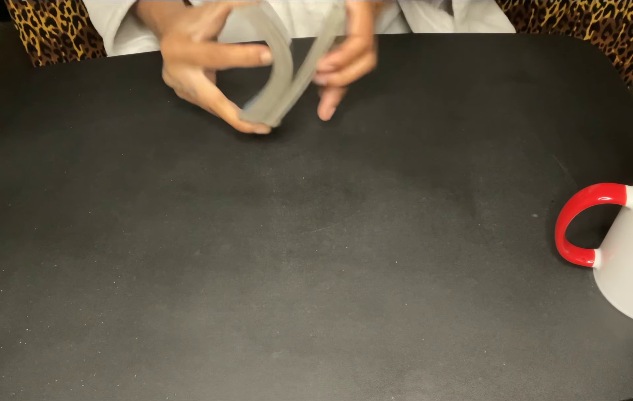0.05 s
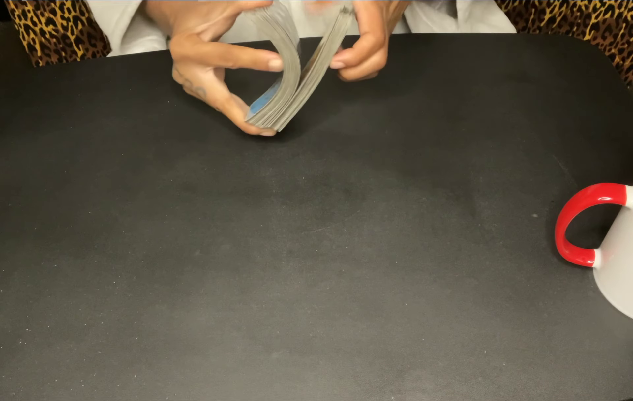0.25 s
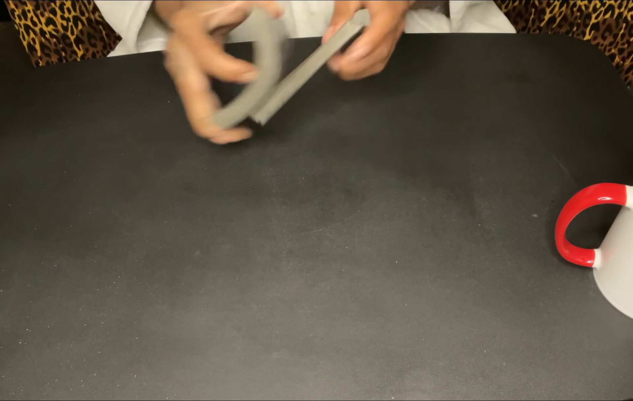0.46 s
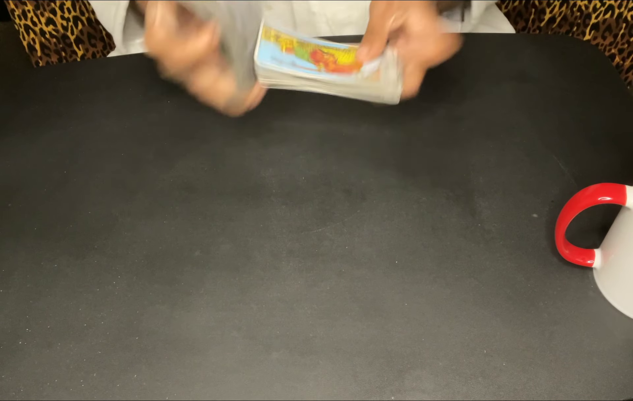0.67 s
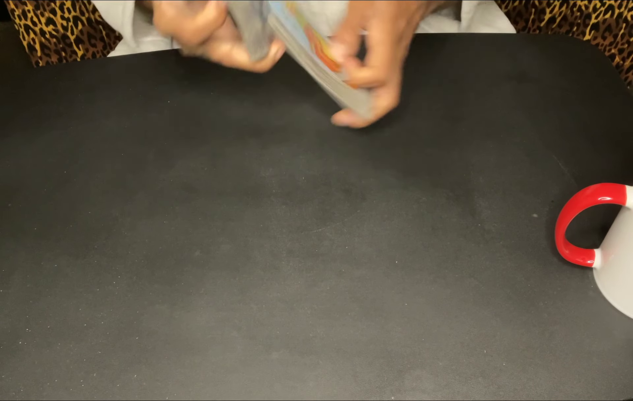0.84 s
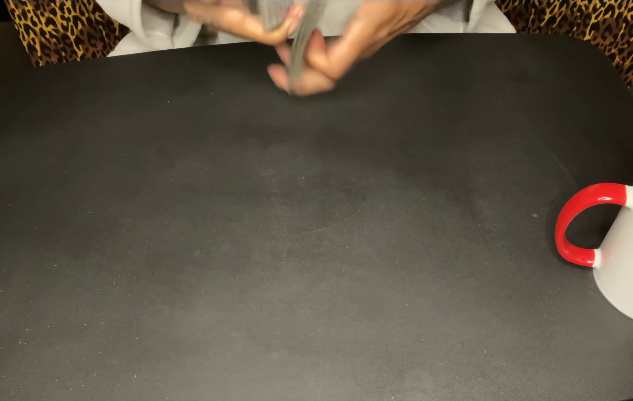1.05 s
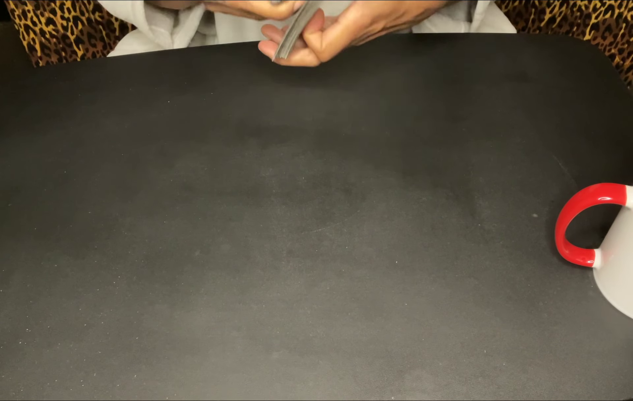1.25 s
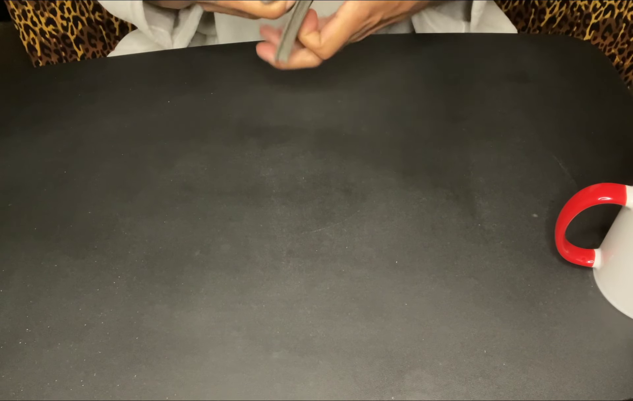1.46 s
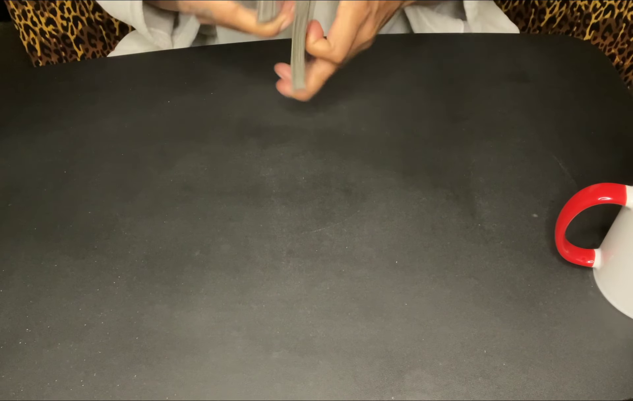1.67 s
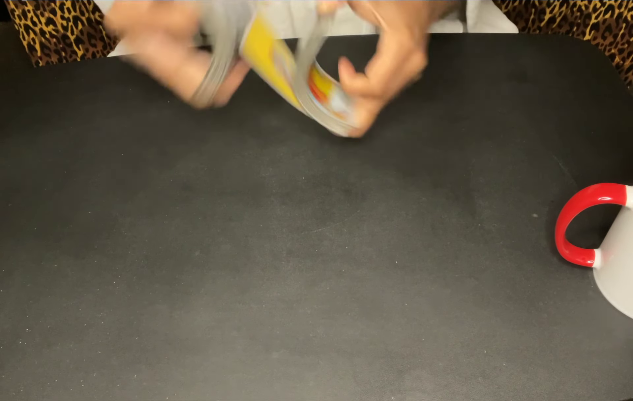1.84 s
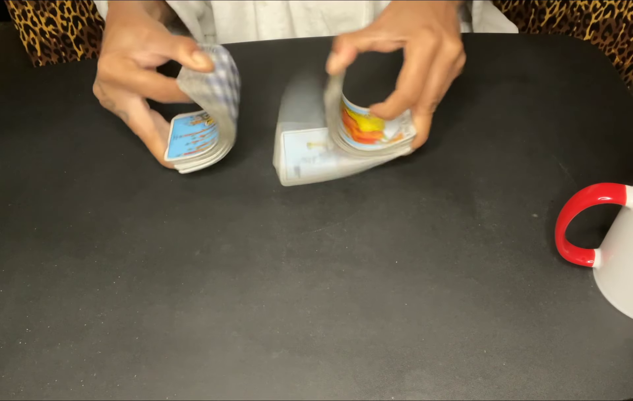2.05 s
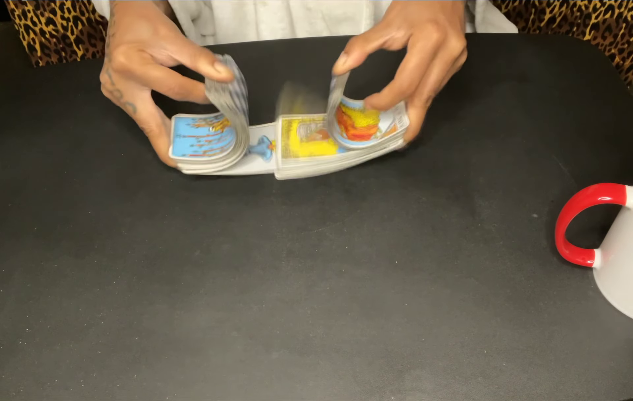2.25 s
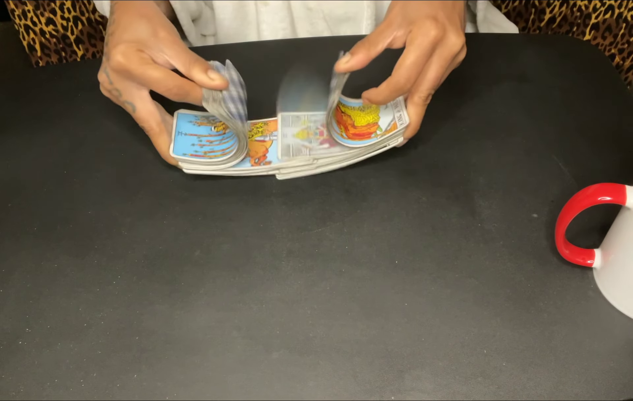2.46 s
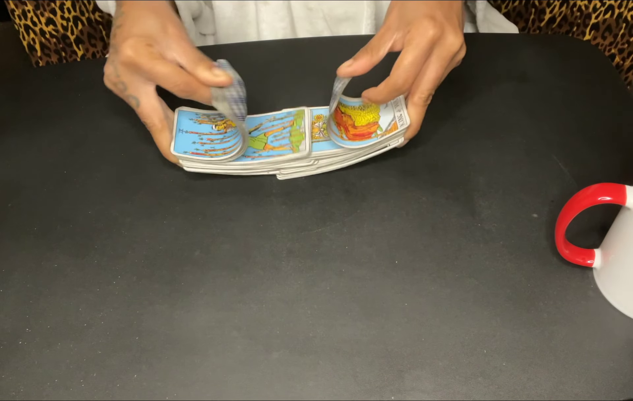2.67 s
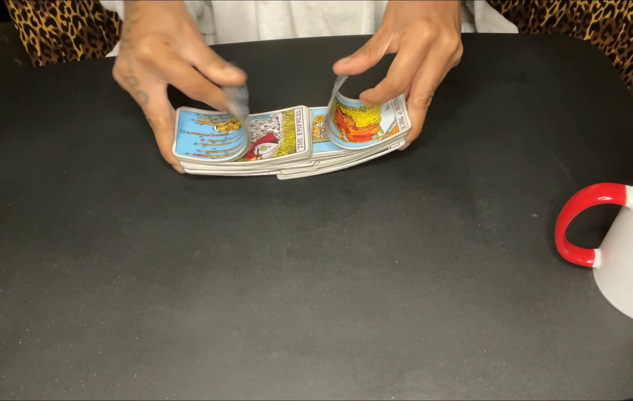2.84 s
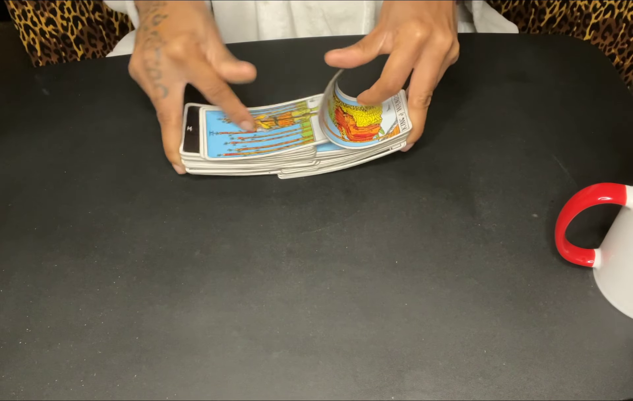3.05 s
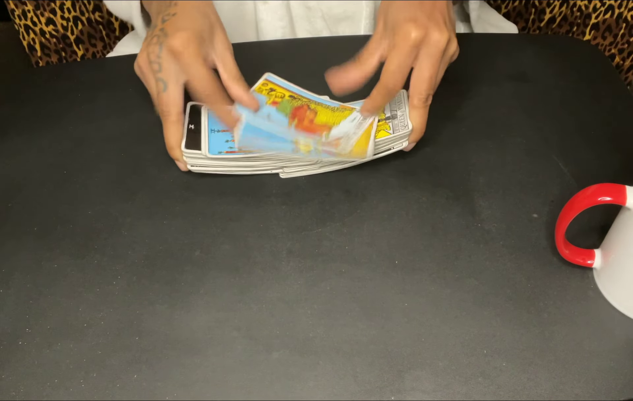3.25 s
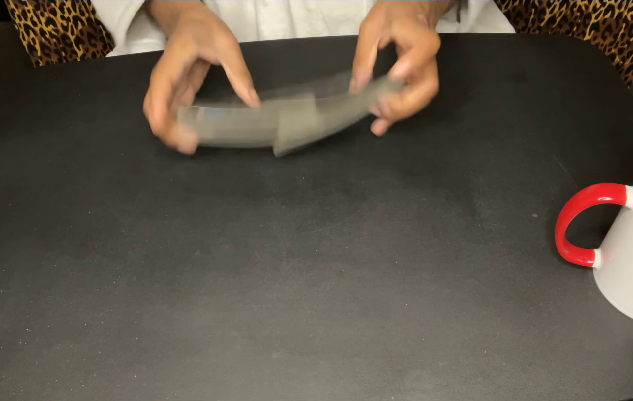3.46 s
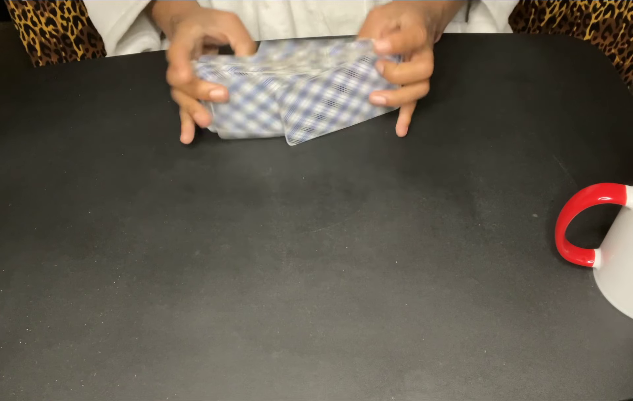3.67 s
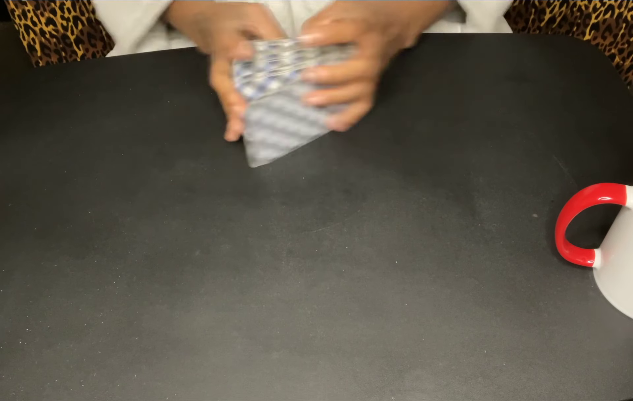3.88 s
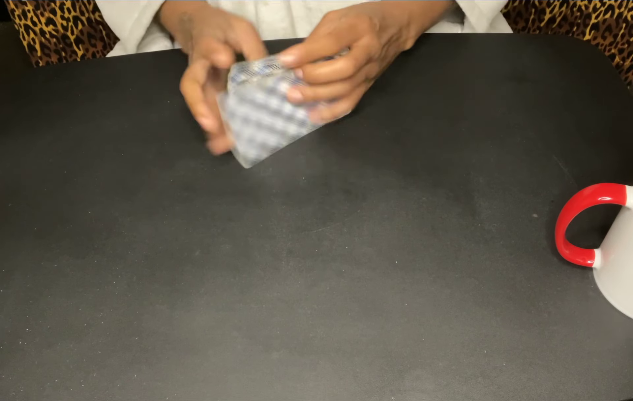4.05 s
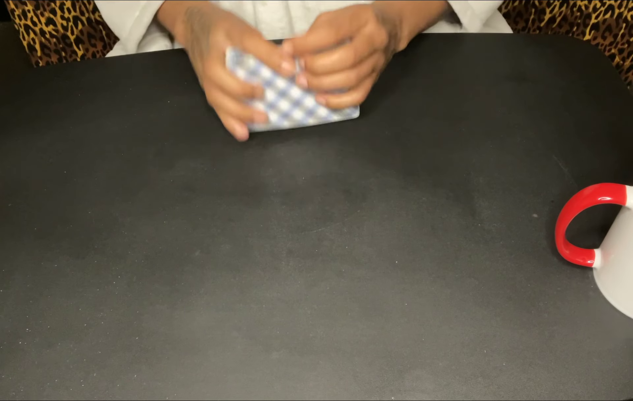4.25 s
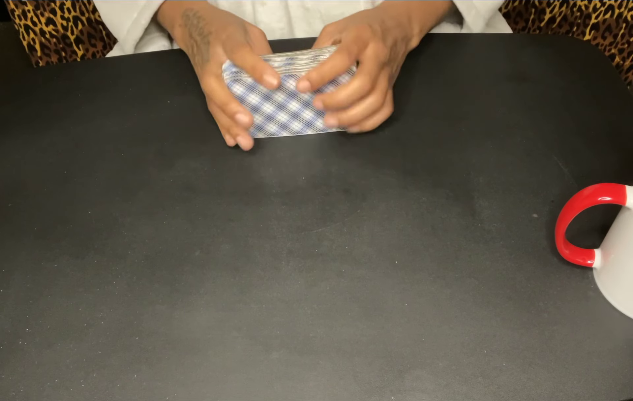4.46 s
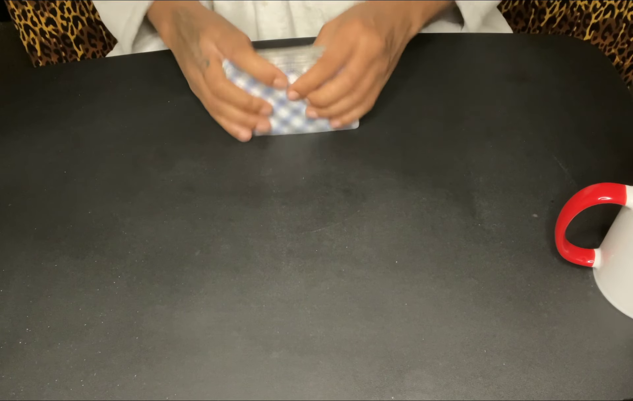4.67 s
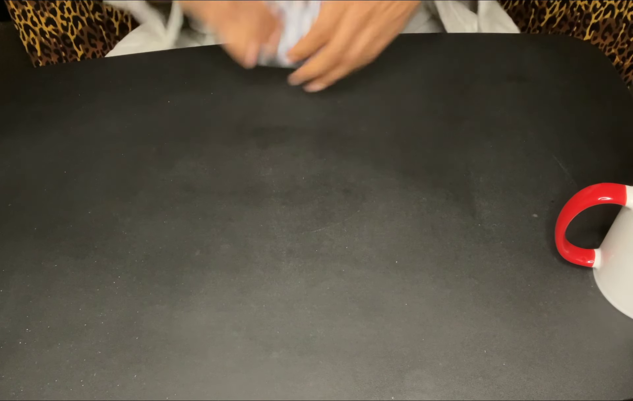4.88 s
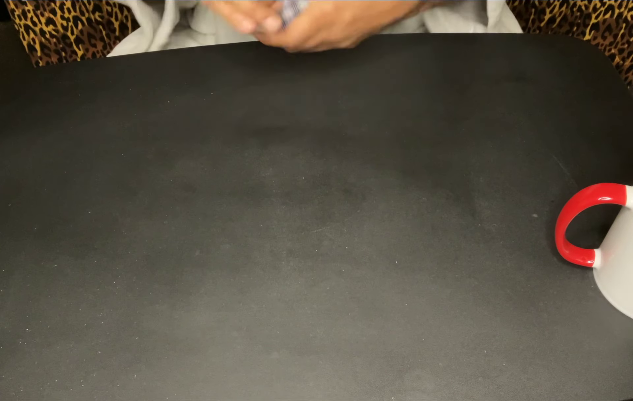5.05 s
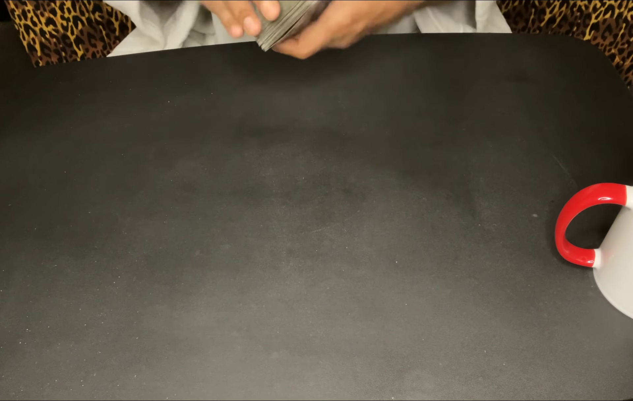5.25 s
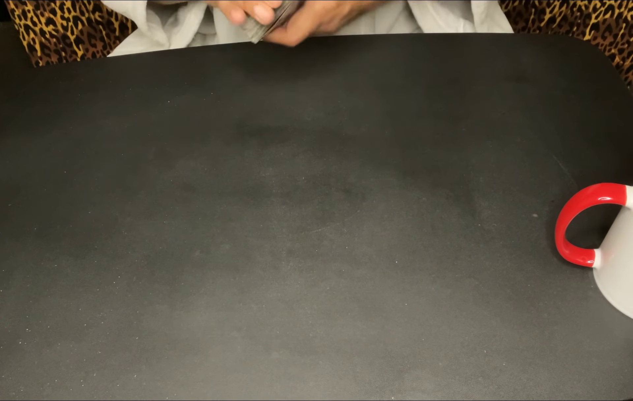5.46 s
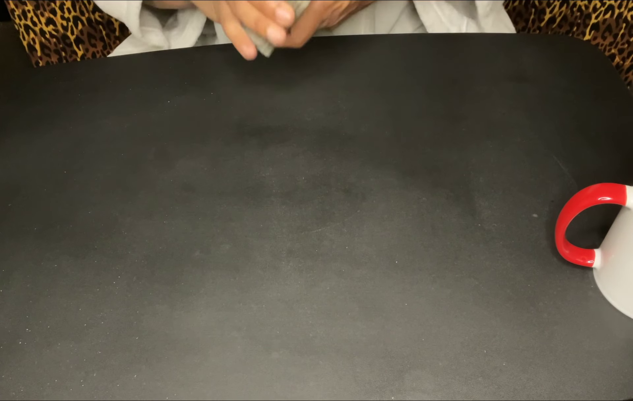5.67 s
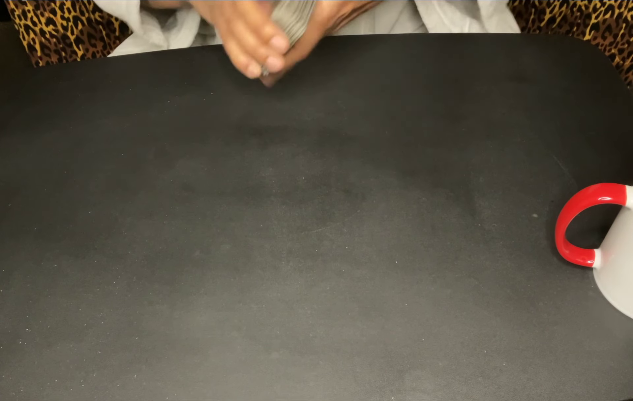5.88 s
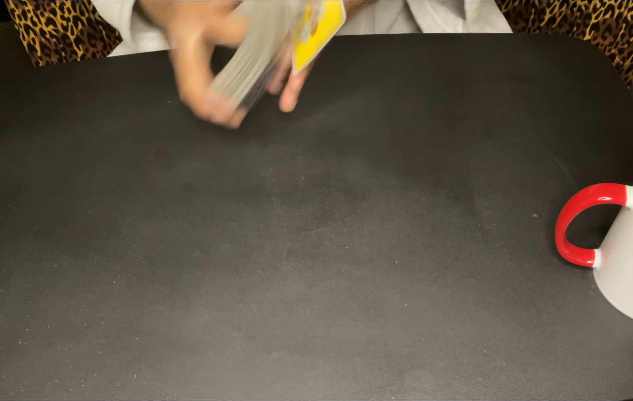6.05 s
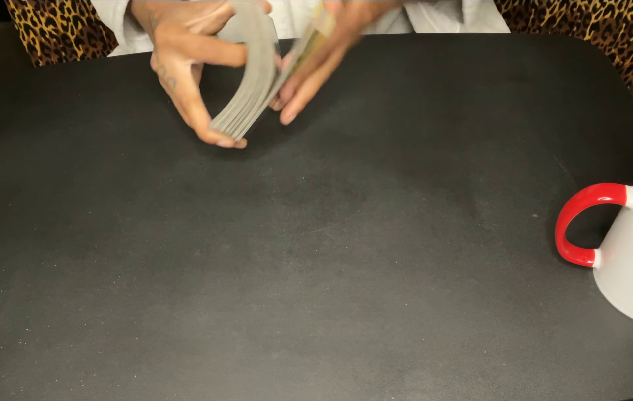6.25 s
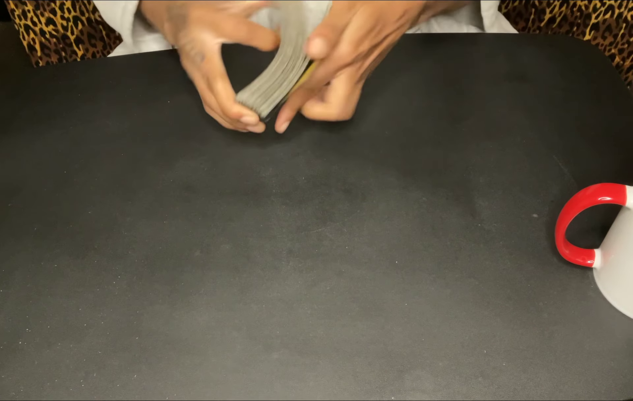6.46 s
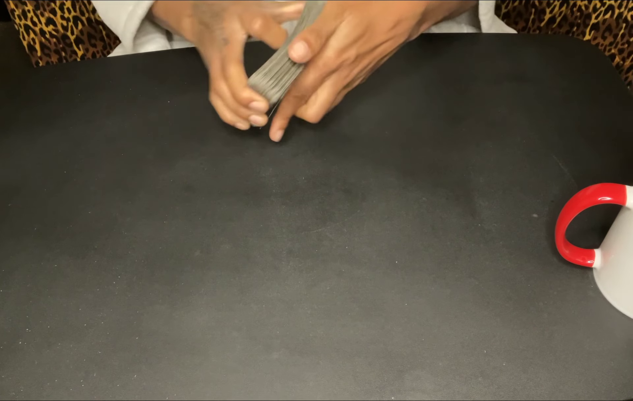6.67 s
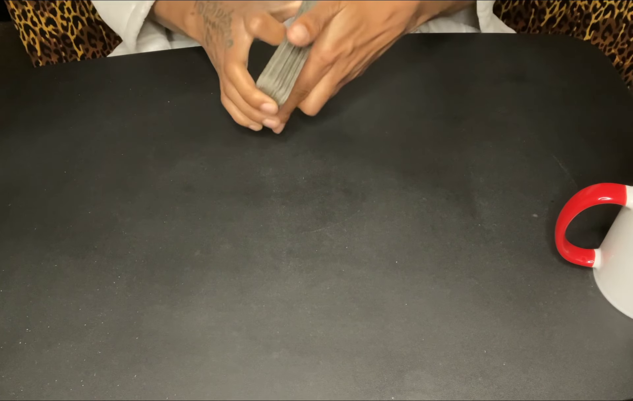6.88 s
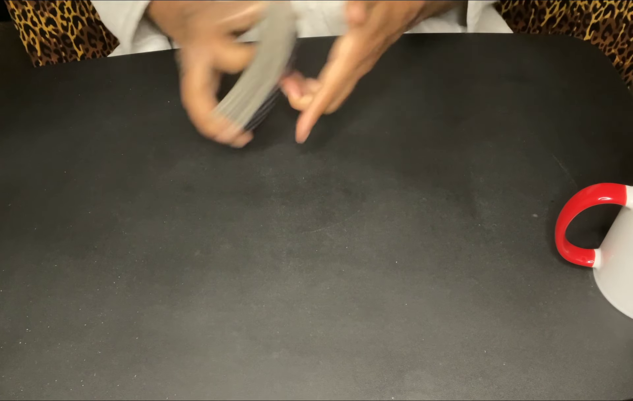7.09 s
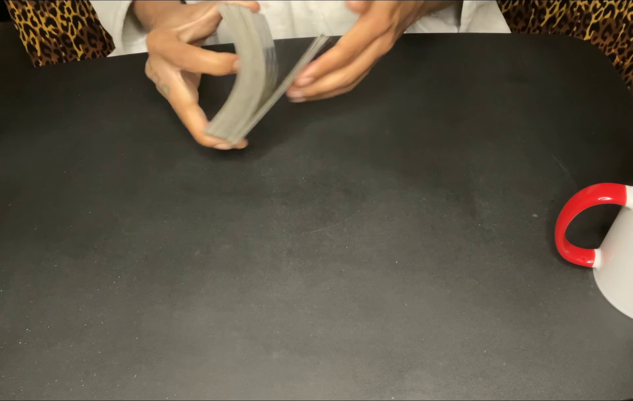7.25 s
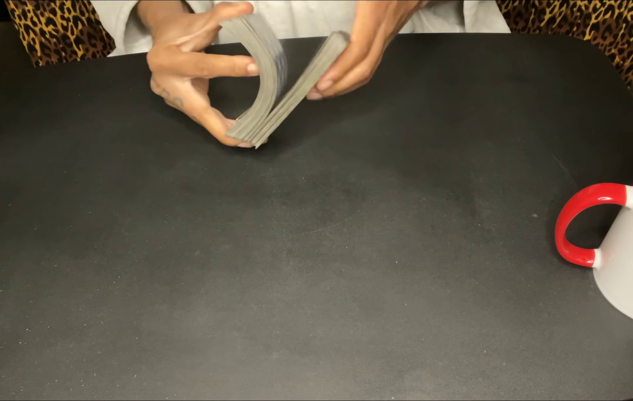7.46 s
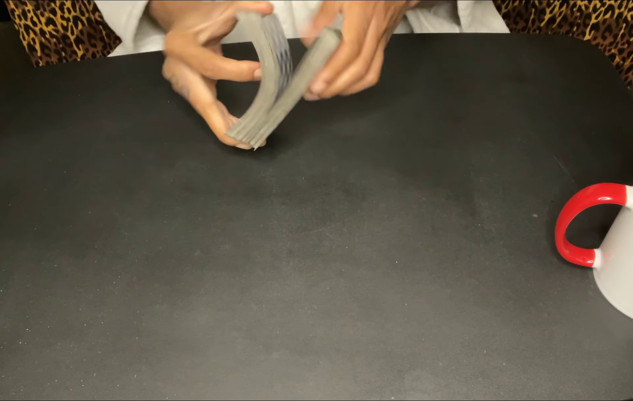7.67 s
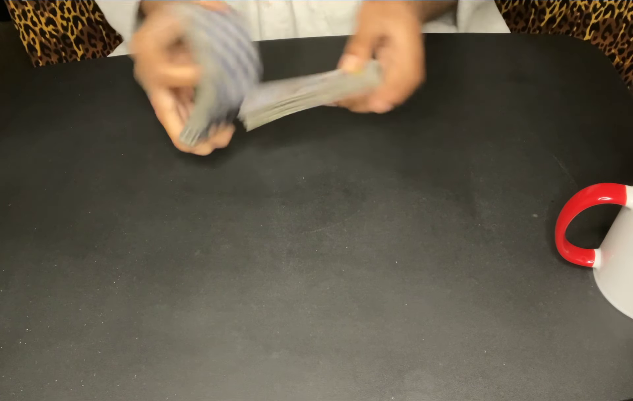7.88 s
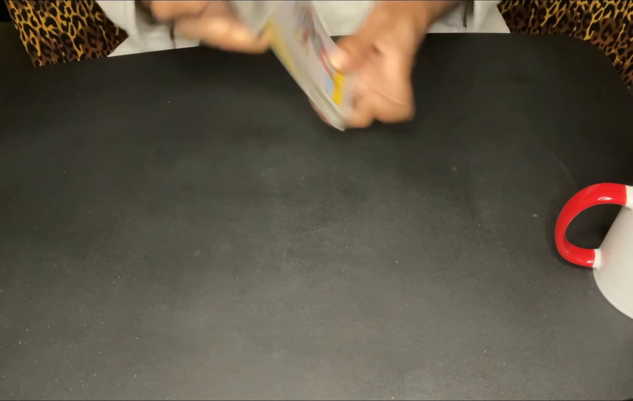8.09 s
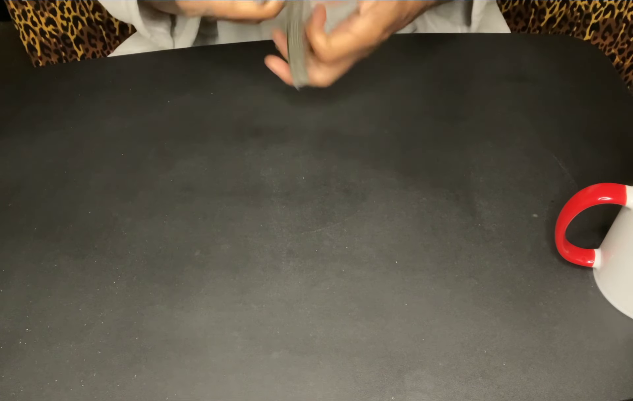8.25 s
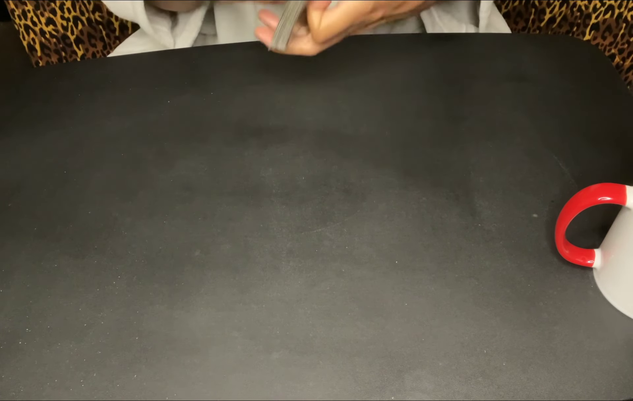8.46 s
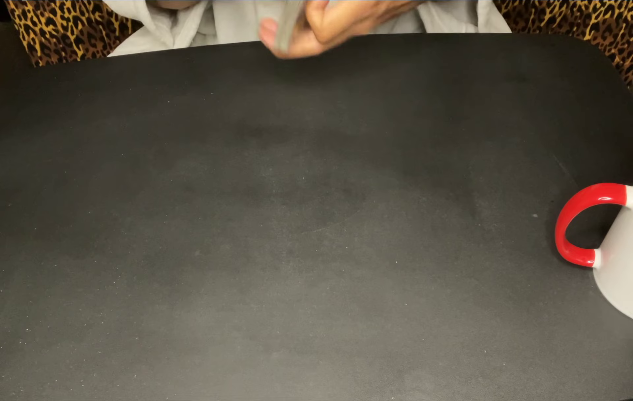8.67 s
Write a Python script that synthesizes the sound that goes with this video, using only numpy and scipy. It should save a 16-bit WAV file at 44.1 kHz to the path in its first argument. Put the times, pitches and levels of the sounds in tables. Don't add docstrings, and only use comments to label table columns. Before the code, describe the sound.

Close to a padded tabletop in a small quiet room, a few cards snap off a thumb, fingers rustle softly, then a rapid riffle slaps loudly onto the table and thins out. The arched deck cascades down with duller knocks, is pushed together with soft slides and squared with a tap. After quiet handling, lighter flicks come in quick runs and fade into faint hiss.

```python
import sys
import numpy as np
from scipy import signal
from scipy.fft import rfft, irfft, next_fast_len
from scipy.io import wavfile
from scipy.ndimage import uniform_filter1d

SR = 44100
rng = np.random.default_rng(int(sys.argv[2]) if len(sys.argv) > 2 else 0)


def ratio_of_db(decibels):
    return 10 ** (np.asarray(decibels, float) / 20)


def pcm_store(signal):
    levels = np.round(np.clip(np.atleast_2d(signal), -1, 1) * 32767)
    wavfile.write(sys.argv[1], SR, levels.astype(np.int16).T)


N = 384552

# t/s, peak level/dB, thump level/dB, ring f/Hz
FIRST_FLICKS = [
    (0.0044, -20, -12, 1855),
    (0.0292, -8.5, -17, 1720),
    (0.0424, -22, -1, 2193),
    (0.0604, -27, -10.5, 2092),
    (0.0721, -2, -9.5, 2410),
    (0.1364, -26, -8.5, 2555),
    (0.1529, 1, -11.5, 2540),
]
# t/s, peak level/dB, thump level/dB, ring f/Hz
LATER_FLICKS = [(6.0835, -26.5, -8.5, 2470), (6.1483, -36.5, -11.5, 2200), (6.1628, -16, -6, 6560),
                (6.1703, -8.5, -13, 2000), (6.2217, -24, -10.5, 3450), (7.2009, -34, -17, 2025),
                (7.2144, -35, -19.5, 3060), (7.224, -28.5, -3, 2760), (7.2349, -16.5, -7, 2446),
                (7.2897, -41, -27, 1730), (7.3112, -18, -6, 3105), (7.3386, -12, -10.5, 2379),
                (7.3601, -20, -2, 2021), (7.371, -17, -3.5, 2140), (7.3764, -16, -5, 2545),
                (7.3915, -11.5, -6.5, 2448), (7.438, -39.5, -2, 2040), (7.4568, -4, -10.5, 2455),
                (7.4715, -18.5, -13.5, 2503), (7.5034, -21.5, -6, 2590), (7.5222, -15.5, -1.5, 2310),
                (7.5334, -28, -13, 2270)]
# t/s, peak level/dB, thump level/dB, ring f/Hz
HANDLING_TICKS = [(0.6624, -46, -10.5, 2100), (0.7017, -31.5, -11, 2380), (0.7835, -53.5, -13.5, 3340),
                  (0.8209, -35, -20, 2791), (1.7847, -37, 1, 1210), (1.7902, -29.5, -10.5, 2650),
                  (4.6313, -41.5, -14.5, 5130), (4.9635, -45.5, -22, 1950), (5.6909, -38, -23.5, 2600),
                  (6.1099, -38.5, -23, 2470), (6.2365, -34, -12, 3590), (6.5285, -28, -15.5, 2240),
                  (7.664, -50.5, -20, 5960), (8.0101, -29.5, -7.5, 1695), (8.104, -48, -20.5, 6500),
                  (8.167, -49, -21.5, 4010), (8.405, -41.5, -25, 9030), (8.446, -49, -20, 3000)]
# f/Hz, level/dB, t60/s
CUPPED_DECK = [(480, -1.5, 0.0047), (783, 2, 0.0094), (975, 0.5, 0.0096), (1350, -1, 0.00705),
               (1720, -4, 0.0053)]
# f/Hz, level/dB, t60/s
BENT_HALF_DECK = [(512, -4.5, 0.0053), (873.4, 0, 0.0087), (1106, 1, .008), (1500, 0.5, .008),
                  (2000, -1, .007)]


def flicks():
    rows = voiced(LATER_FLICKS, (-19.5, -0.47, 0, 0.5)) + voiced(HANDLING_TICKS, (-44, -0.72, -10.5, 4.63))
    out = contacts(rows, CUPPED_DECK, thump_db=-0.5, ring_db=-2.5, ring_t60=0.0073,
                   chatter_db=-9.5, chatter_t60=0.008, wet_db=-5.5, low_wet_db=-4, echo_db=-3,
                   blur=0.084, wide=2.634)
    out += contacts(voiced(FIRST_FLICKS, (-19.5, 0.32, -1, 1.63)), BENT_HALF_DECK, thump_db=0.5,
                    ring_db=-7.5, ring_t60=0.00358, chatter_db=-8.5, chatter_t60=0.01,
                    wet_db=-6.5, low_wet_db=1.0, echo_db=-7, blur=0.12, wide=3.3, top=1.334)
    return signal.sosfilt(signal.butter(2, 300, "high", fs=SR, output="sos"), out)


# t/s, peak level/dB, thump level/dB, ring f/Hz
SLAPS = [(1.9896, -21, -16.5, 1350), (2.0142, -11.5, -14.5, 2132), (2.0555, -31, -12, 1408),
         (2.0674, -13.5, -11.5, 2144), (2.0722, -6.5, -11, 2608), (2.115, -34, -20, 5992),
         (2.1338, -20, -4, 1397), (2.151, 5, -14, 2000), (2.1769, -6, -9, 2109), (2.2727, 1.5, -10.5, 3980),
         (2.3466, -26, 2, 4173), (2.364, 5.5, -15.5, 1963), (2.4374, 8.5, -21.5, 2214),
         (2.4492, 4.5, -12.5, 1803), (2.4757, 3, -25, 2603), (2.5122, 1.5, -26.5, 2206),
         (2.569, 9, -23.5, 1861), (2.6148, 6, -30, 2200), (2.627, -1, -17, 2198), (2.666, 6.5, -16.5, 2191)]
# t/s, peak level/dB, thump level/dB, ring f/Hz
LAST_SLAPS = [(2.7763, 4.5, -20.5, 1923), (2.785, 4, -27, 1750), (2.9045, -4, -18, 2000),
              (2.9236, -15.5, -25.5, 1620), (2.9286, -3.5, -26, 1825), (2.9725, -17, -17, 2960),
              (2.9853, -9.5, -15.5, 2910), (3.0015, -10.5, -26, 2184), (3.007, -23, -22.5, 4476),
              (3.0204, -14.5, -18, 3780), (3.0262, -15.5, -32, 2298), (3.1137, -3, -23, 3910),
              (3.1245, -24, -26.5, 4501), (3.1362, -11.5, -27, 3038), (3.1768, -26.5, -24.5, 2673),
              (3.196, -19.5, -26, 2670), (3.206, -21, -23, 4647)]
# t/s, peak level/dB, thump level/dB, ring f/Hz
BENT_CARDS = [
    (2.201, 3, -12.5, 2556),
    (2.266, -3.5, -5, 2508),
    (2.2834, -9, -7, 2520),
    (2.2735, -6.5, -30, 4690),
    (2.4765, -3, -30, 4655),
    (2.513, -7.5, -30, 4545),
]
# f/Hz, level/dB, t60/s
TABLE = [(80.8, -10, 0.079), (105, -20, 0.042), (141, -4, 0.1), (186, -3, 0.056), (254.8, -2.5, 0.055),
         (317.5, -1.5, 0.055), (404.8, 5.5, 0.035), (480, -3.5, 0.07), (610.7, 4, 0.046), (723, -5, 0.043),
         (966, -6, 0.024)]


def slaps():
    out = contacts(voiced(SLAPS, (-13.5, 0.5651, -10, -0.14)), TABLE, thump_db=-6.0,
                   ring_db=-8, ring_t60=0.0072, chatter_db=-7, chatter_t60=0.012,
                   wet_db=-2.0, low_wet_db=-3.0, echo_db=-0.54, wide=2.3)
    out += contacts(voiced(LAST_SLAPS, (-16, 0.03, -12, -0.01)), TABLE, thump_db=-5.5,
                    ring_db=-8, ring_t60=0.0062, chatter_db=-5.5, chatter_t60=0.013,
                    wet_db=-1.0, low_wet_db=-2.0, echo_db=-2, wide=2.394)
    out += contacts(voiced(BENT_CARDS, (-14, 0.38, -4, 0.31)), TABLE, thump_db=-3.5,
                    ring_db=-1.0, ring_t60=0.021, chatter_db=-8.0, chatter_t60=0.014,
                    wet_db=-2.5, low_wet_db=-3.0, echo_db=-0.18, blur=0.19)
    return signal.sosfilt(signal.butter(4, 92, "high", fs=SR, output="sos"), out)


# t/s, peak level/dB, hiss centre f/Hz
EDGE_SNAPS = [(0.0049, -24.5, 5000), (0.03, -19.5, 5500), (0.1532, -8, 4500), (2.1768, -4.5, 5500),
              (2.267, -5, 5000), (2.4487, 2, 5500), (2.4762, 4, 5600), (2.5126, -3, 4600),
              (2.5673, 0, 5000), (2.6263, -9, 5000), (2.666, -2, 5000), (2.7865, -4, 5000),
              (2.9247, -11.5, 5500), (3.018, -13, 5500), (3.1137, -6, 5500), (3.1769, -22.5, 5000),
              (3.2067, -21.5, 5000), (3.6404, -30, 4000), (3.6553, -26.5, 4000), (3.677, -24.5, 4500),
              (3.6845, -24.5, 4500), (3.7219, -23.5, 5000), (3.7324, -30.5, 4500), (4.3919, -23.5, 3600),
              (4.4137, -26, 3600)]
# t/s, peak level/dB, hiss centre f/Hz
GRAZES = [
    (0.066, -39.5, 6000),
    (0.135, -36, 4997),
    (2.345, -24, 4206),
    (4.392, -25.5, 3400),
    (2.7695, -24, 3500),
    (2.887, -34, 3500),
    (2.9705, -20, 4030),
    (3.105, -20, 4000),
    (3.136, -22, 4500),
]


def card_edges():
    def thin(rows):
        return [(s, db, -60, hz, -17, -14) for s, db, hz in rows]

    out = contacts(thin(EDGE_SNAPS), TABLE, thump_db=0, ring_db=-8, ring_t60=0.008,
                   chatter_db=-16, chatter_t60=0.0079, wet_db=-7, echo_db=0.5, wide=1.7, blow_db=-9)
    out += contacts(thin(GRAZES), TABLE, thump_db=0, ring_db=-30, ring_t60=0.008,
                    chatter_db=-8, chatter_t60=0.035, wet_db=-5, wide=2.5, blow_db=-25)
    return out


# t/s, peak level/dB, thump level/dB, ring f/Hz
KNOCKS = [
    (3.5764, -32.5, 13, 1200),
    (3.5861, -21.5, 7, 1316),
    (3.6017, -25, 3, 1217),
    (3.6123, -40, 8.5, 1330),
    (3.6216, -14.5, 7, 1229),
    (3.6306, -32, 1, 1280),
]
# t/s, peak level/dB, thump level/dB, ring f/Hz
CASCADE = [(3.639, -13, 1, 1350), (3.6469, -14, 2, 1337), (3.654, -8.5, -23.5, 1350),
           (3.6584, -14.5, -0.5, 1486), (3.6765, -6.5, -5.5, 1879), (3.6824, -5.5, -4.5, 1499),
           (3.6864, -7, -7, 1201), (3.6973, -12, -8, 2000), (3.7209, -6.5, -28, 1228),
           (3.7313, -7, -32, 1375), (3.7454, -28.5, -18.5, 1365), (3.768, -23, -2, 1290)]
# t/s, peak level/dB, thump level/dB, ring f/Hz
CATCHES = [
    (3.5875, -32.5, -19.5, 3510),
    (3.6775, -17, -23, 3528),
    (3.705, -20, -1, 3556),
    (3.7325, -19, -15.5, 3680),
    (3.778, -21, -20.5, 1500),
    (3.9734, -30.5, 2, 3474),
    (3.9827, -22, -12, 1634),
    (4.06, -26.5, -3.5, 1543),
    (4.087, -22, -17, 3625),
    (4.2455, -32.5, -14, 3540),
]
# t/s, peak level/dB, thump level/dB, ring f/Hz
SQUARING = [
    (4.1964, -31, 3.5, 1378),
    (4.2074, -48, 13.5, 1490),
    (4.2133, -44.5, 10.5, 1300),
    (4.3889, -9, 3.5, 1894),
    (4.3958, -13, -2, 1435),
    (4.403, -11.5, -3.5, 1321),
    (4.4144, -11.5, -12.5, 1420),
]
# f/Hz, level/dB, t60/s
ARCHED_PILE = [(135.6, -26.5, 0.19), (244.6, -30.5, 0.053), (343, -7, 0.065), (417.8, 2.5, 0.068),
               (581, 3, 0.0182), (853, 2.5, 0.0178), (1090, -10, 0.0146)]
# f/Hz, level/dB, t60/s
FALLING_ARCH = [(249, -19.5, 0.037), (397.6, -4.5, 0.0385), (577.5, 1, 0.029), (708.6, 2.5, .02),
                (854, 1.5, 0.018), (972, -3.5, 0.014), (1350, -1.5, 0.0158)]
# f/Hz, level/dB, t60/s
SQUARED_PILE = [(137.3, -18.5, 0.222), (172.6, -20.5, 0.0435), (234.6, -6.5, 0.0444), (350.3, -2, 0.0423),
                (423, 4, 0.048), (557, 1.5, 0.0285), (813.4, -2, 0.0365), (993.6, -3.5, 0.028)]


def knocks():
    out = contacts(voiced(KNOCKS, (-40, -1.04, -8, 0.5)), ARCHED_PILE, thump_db=-7.0,
                   ring_db=-6.5, ring_t60=0.017, chatter_db=-12.5, chatter_t60=0.029, wet_db=0.5)
    out += contacts(voiced(CASCADE, (-47, -0.29, -8, 0.16)), FALLING_ARCH, thump_db=-5,
                    ring_db=-8, ring_t60=0.012, chatter_db=-9.5, chatter_t60=0.0264,
                    wet_db=-1.0, low_wet_db=-3)
    out += contacts(voiced(CATCHES, (-24, -0.9, 0.5, 0.25)), FALLING_ARCH, thump_db=-2.5,
                    ring_db=1.5, ring_t60=0.038, chatter_db=-17, chatter_t60=0.0184,
                    wet_db=-7.5, blur=0.12)
    out = signal.lfilter(*signal.butter(2, 7000, fs=SR), out)
    out += contacts(voiced(SQUARING, (-28.5, -0.74, -7.5, 0.54)), SQUARED_PILE, thump_db=-6.5,
                    ring_db=-7.5, ring_t60=0.0129, chatter_db=-10.5, chatter_t60=0.0293,
                    wet_db=0.0, low_wet_db=-4)
    return signal.sosfilt(signal.butter(2, 85, "high", fs=SR, output="sos"), out)


def voiced(rows, voice):
    edge_db, edge_slope, ring_db, ring_slope = voice
    return [(s, db, low_db, hz, edge_db + edge_slope * db, ring_db + ring_slope * db)
            for s, db, low_db, hz in rows]


def snap(x, hz, edge_db, wide, top):
    band = [hz / max(wide, 1.3), min(hz * max(top, 1.1), 12000)]
    hump = signal.lfilter(*signal.butter(2, band, "band", fs=SR), x)
    edge = signal.lfilter(*signal.butter(1, [3500, 11000], "band", fs=SR), x)
    return -3 * hump - ratio_of_db(edge_db + 10) * edge


# delay t/s, level/dB
FLUTTER = [(.0021, -24), (.0047, -19), (0.0108, -13.5), (0.0161, -23.5), (.021, -18), (.0315, -23),
           (.042, -30)]


def contacts(rows, body, thump_db, ring_db, ring_t60, chatter_db, chatter_t60, wet_db, blur=0.053,
             low_wet_db=-3, echo_db=0, wide=3, top=1.82, blow_db=0):
    out = np.zeros((2, N + SR))
    t = np.arange(SR // 5) / SR
    size = next_fast_len(SR * 3 // 5)
    tails = [rfft(tail(0.14), size) for _ in range(7)]
    lead = round(0.0013 * SR)
    blow = ratio_of_db(blow_db) * (np.arange(len(t)) == lead)
    late = np.maximum(t - t[lead], 0)
    shape = np.where(t < t[lead], 0.43 * t / t[lead], ratio_of_db(-60 * late / chatter_t60))
    give = 1 - np.exp(-late / 0.00036)
    for k, (s, db, low_db, hz, edge_db, bend_db) in enumerate(rows):
        ticks = 0.3773 + 3 * (rng.random(len(t)) < 0.05)
        noise = rng.standard_normal((2, len(t))) * [[1], [0.11]]
        chatter = ratio_of_db(chatter_db) * shape * ticks * noise
        edge_fade = edge_db - 60 * late / 0.025
        both, apart = ratio_of_db(db) * snap(chatter, hz, edge_fade, wide, top)

        drift = np.cumsum(rng.standard_normal(len(t)) * (late > 0)) * blur
        ring_gain = ratio_of_db(ring_db + bend_db - 60 * late / ring_t60 * hz / 2500)
        ring = -ring_gain * np.sin(2 * np.pi * hz * late + drift)

        gains, shifts = rng.normal(0, [[3], [0.03]], (2, len(body)))
        thump = np.zeros(len(t))
        for (f, mode_db, life), g, u in zip(body, gains, shifts):
            thump -= ratio_of_db(mode_db + g - 60 * late / life) * np.sin(2 * np.pi * f * (1 + u) * late)
        thump *= ratio_of_db(low_db + thump_db) * give

        parts = ratio_of_db(db) * np.array([snap(blow, hz, edge_db, wide, top), ring, thump])
        direct = parts.sum(0) + both
        near = np.pad(direct + [apart, -apart], ((0, 0), (0, SR // 20)))
        for lag, wall_db in FLUTTER:
            bounce = ratio_of_db(echo_db + wall_db + rng.normal(0, 1.2)) * (direct - parts[2])
            near[:, round(lag * SR):][:, :len(t)] += bounce
        sent = rfft(parts * [[1], [1], [ratio_of_db(low_wet_db)]], size)
        far = sum(p * tails[(k + j) % len(tails)] for j, p in enumerate(sent))
        start = round(s * SR)
        out[:, start:][:, :near.shape[1]] += near
        out[:, start:][:, :size] += ratio_of_db(wet_db) * irfft(far, size)
    return out[:, :N]


# t/s, slide level/dB, drag level/dB, time to fade by 20 dB t/s
PUSHES = [
    (3.755, -53, -35, 0.3319),
    (3.873, -44.5, -38.5, 0.1889),
    (3.994, -66, -40.5, 0.1575),
    (4.087, -42, -38.5, 0.0538),
    (4.151, -55.5, -42.5, 0.1222),
    (4.209, -47, -37.5, 0.0385),
    (4.244, -56.5, -67, 0.1944),
    (4.744, -52, -47, 0.0483),
]
# f/Hz, level/dB per Hz
FACE_SPECTRUM = [(880, -18.5), (1500, -5.5), (2620, -7), (2920, -6.5), (3690, -1), (4230, -10.5),
                 (4710, -6), (7160, -20.5), (11800, -24.5), (15500, -31.5)]
# f/Hz, level/dB per Hz
PAD_SPECTRUM = [(53, -43), (100, -17.5), (140, 4), (205, -8), (414, 1.5), (523, -1.5), (624, -2.5),
                (875, -4.5), (1090, -10.5), (1500, -14.5), (3000, -30), (3900, -45.5), (6600, -120)]


def pushes():
    slide_stroke = swells([(s, db, fade) for s, db, _, fade in PUSHES], rise=0.7)
    drag_stroke = swells([(s, db, fade) for s, _, db, fade in PUSHES], rise=0.7)
    slide = friction(slide_stroke, FACE_SPECTRUM, rate=590, spread_db=2.5, smooth=0.94, wet_db=-19.5)
    drag = friction(drag_stroke, PAD_SPECTRUM, rate=360, spread_db=-1.5, smooth=0.66, wet_db=-8.0)
    return ratio_of_db(4.5) * slide + ratio_of_db(2.5) * drag


# t/s, level/dB, time to fade by 20 dB t/s, hollow f/Hz
SCUFF = [
    (4.705, -44.5, 0.05, 480),
    (4.736, -42, 0.0114, 627),
    (4.76, -45.5, -0.0843, 860),
]


def scuff():
    out = np.zeros((2, N))
    for s, db, fade, hz in SCUFF:
        hollow = [(hz / 3, -30), (hz, 0), (hz * 1.22, -7), (hz * 3, -20), (12000, -45)]
        out += friction(swells([(s, db, fade)], rise=1.25), hollow, rate=1500, spread_db=3,
                        smooth=1.19, wet_db=-10.5)
    return out


# peak t/s, level/dB, time to fade by 20 dB t/s
STROKES = [(0.0, -45, 0.2016), (0.045, -48, 0.08), (0.33, -62, 0.7), (0.52, -61, 0.01),
           (0.825, -55.5, 0.04), (1.0, -63, 0.76), (1.422, -59, 0.02), (1.76, -58, 0.03),
           (1.888, -60, 0.2365), (3.22, -50.5, 0.2), (3.32, -58, 0.51), (3.53, -59.5, 0.19),
           (4.52, -65, 0.47), (3.87, -46, 0.0654), (4.085, -52.5, -0.0134), (4.66, -65, 0.12),
           (4.74, -57.5, 0.1141), (4.96, -61, 0.1571), (5.088, -58, 0.0424), (5.39, -70, 0.24),
           (5.98, -52.5, 0.105), (6.366, -56.5, 0.22), (6.6, -67.5, 0.25), (7.034, -68.5, 0.43),
           (4.3, -71.5, 0.77), (7.62, -66, .5), (7.82, -55.5, 0.1224), (8.0, -60.5, 0.0833),
           (8.1, -65.5, 0.64)]
# t/s, level/dB
BRUSHES = [(0.704, -54.5), (0.786, -55.5), (1.6, -72.5), (1.786, -56.5), (3.592, -54.5), (4.995, -57.5),
           (5.692, -67.5), (6.02, -66.5), (6.074, -59), (6.09, -54.5), (6.18, -44.5), (6.222, -49),
           (6.532, -65.5), (8.012, -55.5), (8.406, -69.5)]
# f/Hz, level/dB per Hz
SKIN_SPECTRUM = [(710, -39), (1200, -8.5), (1290, -1), (2310, -2.5), (3110, -3), (5040, -3.5), (6170, -7),
                 (11200, -9.5), (15500, -11.5)]


def rustle():
    brushes = [(s, db, 0.044) for s, db in BRUSHES]
    fingers = swells(STROKES, rise=0.9) + swells(brushes, rise=0.52)
    rub = friction(fingers, SKIN_SPECTRUM, rate=1100, spread_db=4, smooth=1.4, wet_db=-15.0)
    return ratio_of_db(1.0) * rub


def friction(stroke, spectrum, rate, spread_db, smooth, wet_db):
    size = ratio_of_db(spread_db * np.minimum(rng.exponential(1, N), 2))
    slips = (rng.random(N) < rate / SR) * size * np.sign(rng.standard_normal(N))
    rough = unit(slips) + smooth * rng.standard_normal(N)
    direct = stroke * unit(coloured(rough, lambda hz: ratio_of_db(along(spectrum, hz))))
    return direct + ratio_of_db(wet_db) * signal.fftconvolve(direct[None], tail(0.27), axes=1)[:, :N]


def swells(rows, rise):
    s, db, fade = np.transpose(rows)[..., None]
    t = np.arange(0, N / SR, 1 / 1000)
    away = np.maximum((t - s) / fade, (s - t) / (fade * rise))
    return np.interp(np.arange(N) / SR, t, np.linalg.norm(ratio_of_db(db - 20 * away), axis=0))


# f/Hz, t60/s
ROOM_T60 = [(120, 0.61), (400, 0.2252), (1500, 0.298), (5000, 0.33), (13000, 0.41)]
# f/Hz, level/dB
WALL_COLOUR = [(120, -3.5), (600, 4.5), (2500, 0.5), (6000, 2), (13000, -4.5)]


def tail(spread):
    hz, t, z = signal.stft(rng.standard_normal((2, SR // 3)), SR, nperseg=256)
    z[1] *= (spread * hz / (hz + 150))[:, None]
    decay_db = along(WALL_COLOUR, hz)[:, None] - 60 * t / along(ROOM_T60, hz)[:, None]
    mid, side = signal.istft(z * ratio_of_db(decay_db), SR, nperseg=256)[1]
    rise = 1 - np.exp(-np.arange(len(mid)) / SR / 0.00058)
    both = rise * np.array([mid + side, mid - side])
    return both / np.linalg.norm(both[0])


# f/Hz, level/dB
AIR_SPECTRUM = [(15, -54.5), (25, -23), (48, -10.5), (82, -14.5), (108, -5.5), (145, -9), (223, -3),
                (326, -5.5), (354, -3.5), (531, -9.5), (575, -14), (936, -12.5), (2480, -25), (5280, -27.5),
                (16000, -38.5)]
# f/Hz, width f/Hz, level/dB
DRONE = [(373, 300, -4), (707, 41, 0)]
# f/Hz, share
AIR_ALIKE = [(60, 0.94), (240, 0.79), (950, 0.79), (3770, 0.77), (15000, 1)]
# f/Hz, left minus right level/dB
AIR_LEAN = [(60, 3), (380, -2.5), (2380, -1.0), (15000, 1)]
# t/s, level/dB, time to fade by 20 dB t/s
FAR_RUMBLE = [
    (0.35, -65.5, 1.5),
    (1.086, -58.5, 0.93),
    (1.85, -70, .5),
    (6.0, -66, 0.83),
    (7.35, -61, 0.89),
    (8.1, -66.5, 0.56),
]


def room_tone():
    def drone(hz):
        return 1 + sum(ratio_of_db(db - 2) / (1 + ((hz - centre) / width) ** 2) for centre, width, db in DRONE)

    air = pair(lambda hz: ratio_of_db(along(AIR_SPECTRUM, hz)) * drone(hz), AIR_ALIKE)
    air = leaning(air, AIR_LEAN)
    rumble = pair(lambda hz: 1 / (1 + ((hz - 56) / 14) ** 4), [(50, 1.0)])
    return ratio_of_db(-56.5) * air + ratio_of_db(-4.5) * swells(FAR_RUMBLE, rise=0.847) * rumble


def pair(gain, alike):
    def mid_side_gain(hz):
        turn = np.arccos(np.clip(along(alike, hz), -1, 1)) / 2
        return gain(hz) * np.array([np.cos(turn), np.sin(turn)])

    mid, side = coloured(rng.standard_normal((2, N)), mid_side_gain)
    return unit(np.array([mid + side, mid - side]))


def leaning(x, balance):
    return coloured(x, lambda hz: ratio_of_db(np.array([[0.5], [-0.5]]) * along(balance, hz)))


def coloured(x, gain):
    m = next_fast_len(N + 8192)
    return irfft(rfft(x, m) * gain(np.fft.rfftfreq(m, 1 / SR)), m)[..., :N]


def along(points, hz):
    f, v = np.transpose(points)
    return np.interp(np.log(hz + 1), np.log(f + 1), v)


def unit(x):
    return x / np.sqrt(np.mean(x ** 2) + 1e-20)


# f/Hz, left minus right level/dB
DECK_LEAN = [(200, 0.5), (700, -1.67), (2500, -0.58), (8000, 0.14), (14000, 0.07)]


def scene():
    deck = flicks() + slaps() + card_edges() + knocks() + pushes() + scuff() + rustle()
    return leaning(deck, DECK_LEAN) + room_tone()


def roll_off(x):
    return signal.sosfilt(signal.butter(12, 16770, fs=SR, output="sos"), x)


def record(dry):
    heard = coloured(dry, lambda hz: 1 / (1 + (hz / 15750) ** 110))
    mid, side = (heard[0] + heard[1]) / 2, (heard[0] - heard[1]) / 2
    soft = np.abs(uniform_filter1d(mid ** 2, size=1024)) < ratio_of_db(2 * -38)
    merge = uniform_filter1d(1.0 * soft, size=256)
    side = side - merge * coloured(side, lambda hz: hz > 3000)
    heard = np.clip([mid + side, mid - side], -1, 1)
    return roll_off(heard)


dry = scene()
out = record(dry)
pcm_store(out)
```